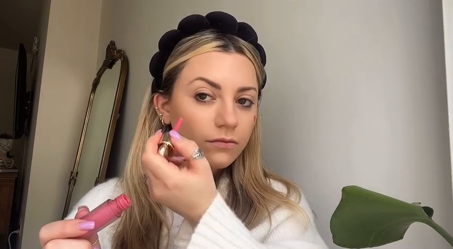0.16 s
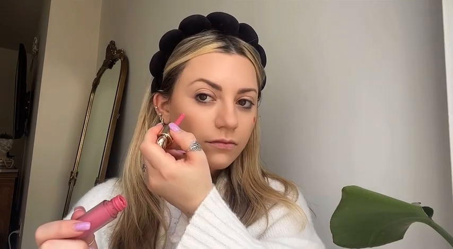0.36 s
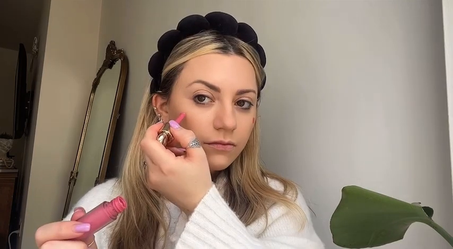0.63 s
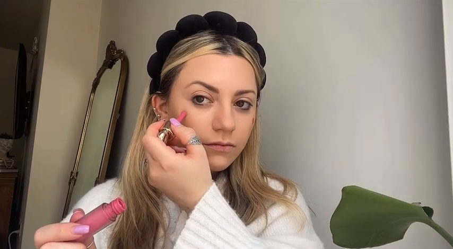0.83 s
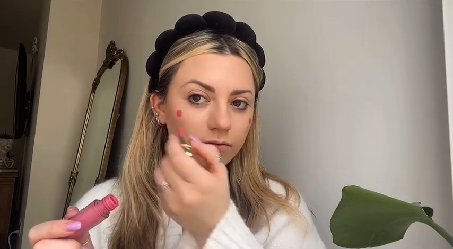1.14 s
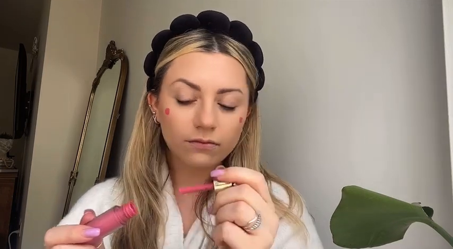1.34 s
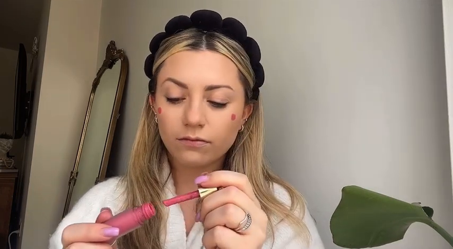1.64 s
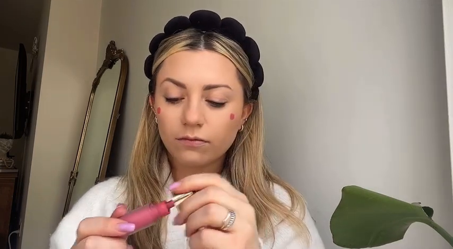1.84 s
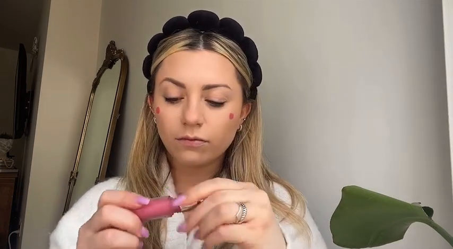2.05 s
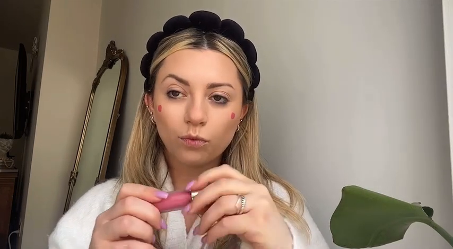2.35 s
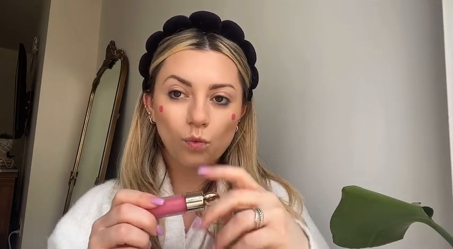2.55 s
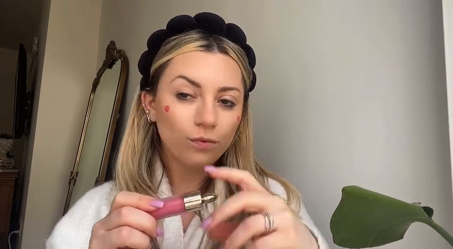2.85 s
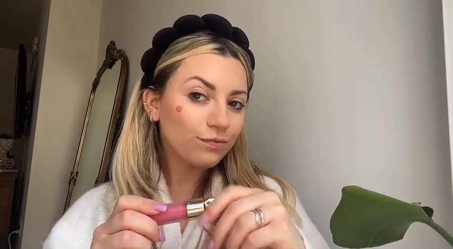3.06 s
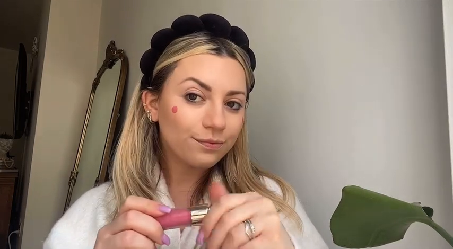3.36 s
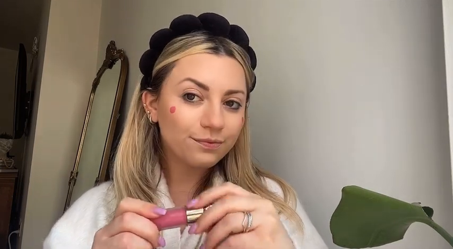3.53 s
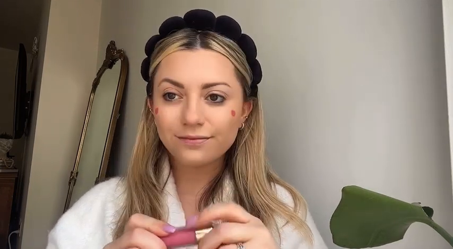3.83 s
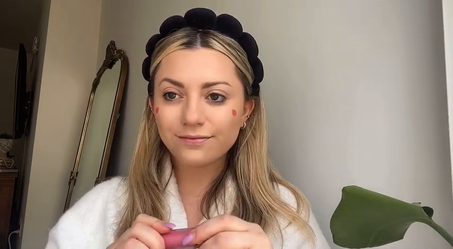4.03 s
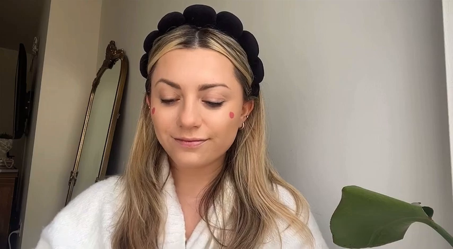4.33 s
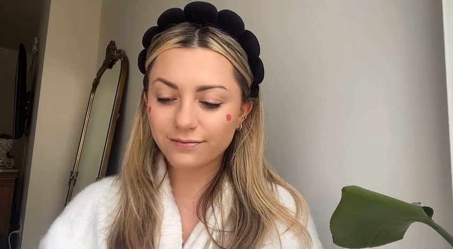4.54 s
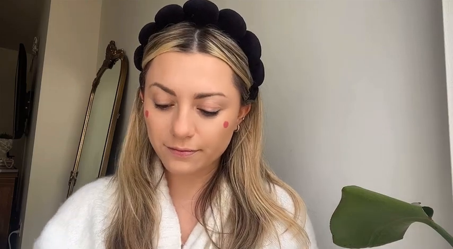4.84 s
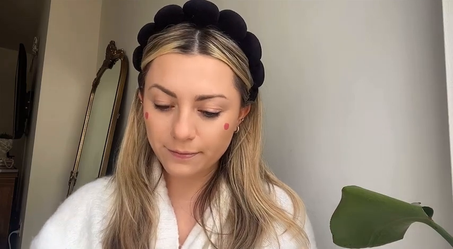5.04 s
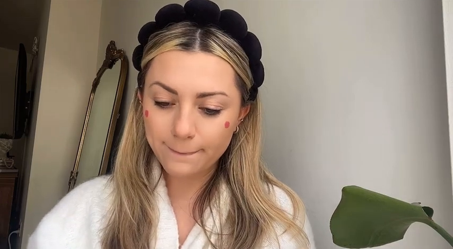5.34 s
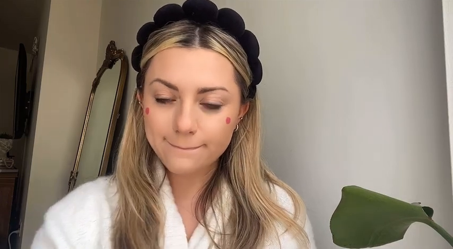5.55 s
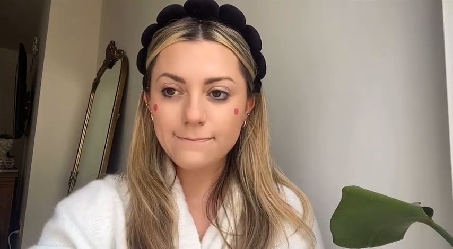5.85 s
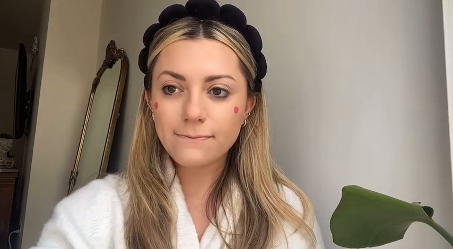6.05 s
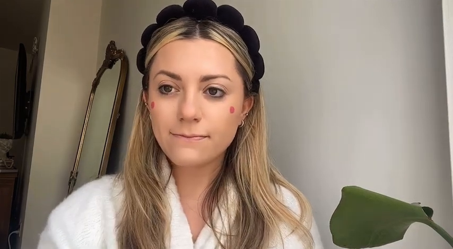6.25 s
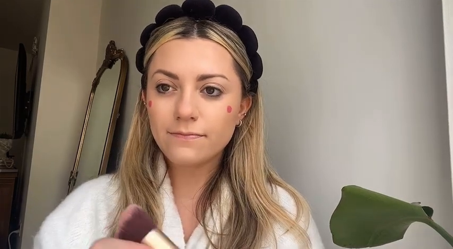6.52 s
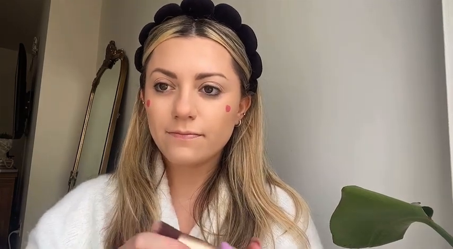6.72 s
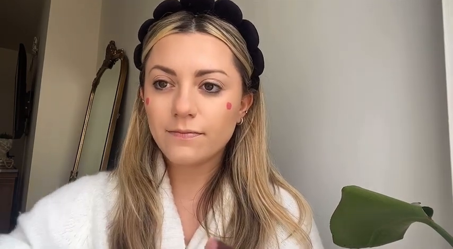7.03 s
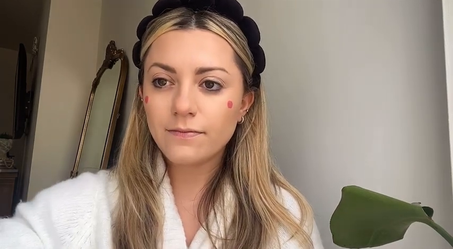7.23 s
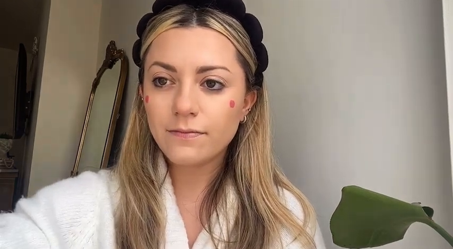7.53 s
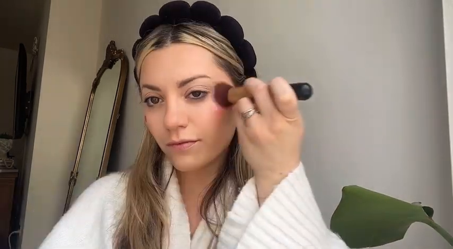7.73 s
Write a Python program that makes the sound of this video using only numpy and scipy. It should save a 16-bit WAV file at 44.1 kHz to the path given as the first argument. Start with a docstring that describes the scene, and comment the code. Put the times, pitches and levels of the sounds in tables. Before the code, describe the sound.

Close, dry handling of a makeup tube: near silence, a sharp cluster of plastic clicks, sparse cap ticks and soft skin glides. Later a hurried run of table knocks, sleeve rustle, thin metallic ticks from a brush collar, then a single strong clack. Only faint rubbing and steady low hum remain, with a tiny dropout near the end.

```python
"""A plastic makeup tube is handled close by in a small room: its wand clicks in the neck and the cap is screwed on.
Then things knock on the table, a brush is picked up and there is one hard clack. Each blow is a patter of
tiny contacts plus a clear ring, coloured by what the thing rings with. Sleeves, skin and fingers rub softly
(swelling noise), ventilation hums (shaped noise and wavering tones), and near the end the sound briefly drops out."""
import sys
import numpy as np
from scipy import signal
from scipy.fft import rfft, irfft
from scipy.io import wavfile
from scipy.ndimage import uniform_filter1d

SR = 44100
rng = np.random.default_rng(int(sys.argv[2]) if len(sys.argv) > 2 else 0)


def master_out(mix):
    """Clip the mix to full scale and print it as 16-bit PCM to the path in sys.argv[1]."""
    frames = np.transpose(np.atleast_2d(mix))
    ceiling = np.clip(frames, -1, 1)
    pcm = np.round(ceiling * 32767).astype(np.int16)
    wavfile.write(sys.argv[1], SR, pcm)


N = 347680
TIME = np.arange(N) / SR
TOP_HZ = 16000  # nearly everything above this is cut at the end
SIZE = 4096  # samples used to shape one blow
FREQS = np.fft.rfftfreq(SIZE, 1 / SR)


def undb(db):
    """Turn decibels into a gain."""
    return 10 ** (np.asarray(db) / 20)


def unit(x):
    """Scale a sound to an rms (average strength) of 1."""
    return x / np.sqrt(np.mean(x ** 2))


def contour(points, f):
    """Join (f/Hz, value) points by straight lines on a log-frequency axis."""
    hz, value = np.transpose(points)
    return np.interp(np.log(f + 1), np.log(hz), value)


def resonance(f, hz, width, db):
    """Power of one damped resonance: a peak at hz that falls away on both sides."""
    return undb(db) ** 2 / (1 + (2 * (f - hz) / width) ** 2)


def add(out, s, sound):
    """Mix a sound in from time s, leaving off any part outside the scene."""
    start = int(round(s * SR))
    lo, hi = max(start, 0), min(start + len(sound), N)
    out[lo:hi] += sound[lo - start:hi - start]


def walk(rate):
    """Slow random wandering with an rms of 1, smoothed from rate random steps per second."""
    step = int(SR / rate)
    wander = np.repeat(rng.standard_normal(N // step + 1), step)
    for _ in range(2):
        wander = uniform_filter1d(wander, step)
    return unit(wander[:N])


def causal(gain):
    """Minimum-phase response: a sharp start, then each peak rings out."""
    cepstrum = irfft(np.log(gain + 1e-9))
    cepstrum[1:SIZE // 2] *= 2
    cepstrum[SIZE // 2 + 1:] = 0
    return np.exp(rfft(cepstrum))


# How the room rings on after a click; each sound's wet_db is added to the level: (f/Hz, level/dB, 60 dB decay/s)
ROOM_TAIL = [(300, -5.5, 0.5), (610, -1.5, 0.32), (1350, -9, 0.39), (2500, -9.5, 0.5), (4000, -10, 0.53),
             (7500, -9, 0.44), (11000, -12, 0.34), (15000, -8, .25)]


def room(x, wet_db, build_s=0.0038, early_db=-13, early_s=0.0087):
    """A dense early scatter off nearby things, then a diffuse tail with its own decay in each band."""
    t = TIME[:SR]
    f = np.fft.rfftfreq(SR, 1 / SR)
    noise = rfft(rng.standard_normal(SR))
    centres = [row[0] for row in ROOM_TAIL]
    build = 1 - np.exp(-t / build_s)
    scatter = rng.standard_normal(SR) * build * np.exp(-t / early_s)
    response = undb(early_db) * scatter / np.sqrt(np.sum(scatter ** 2))
    # each row of the identity matrix picks one band, fading into its neighbours
    for (hz, db, t60), share in zip(ROOM_TAIL, np.eye(len(ROOM_TAIL))):
        band_gain = contour(list(zip(centres, share)), f)
        band = irfft(noise * band_gain, SR)
        fade = np.exp(-np.log(1000) * t / t60) * build
        response += undb(db + wet_db) * band * fade / np.sqrt(np.sum(fade ** 2))
    return signal.fftconvolve(x, response)[:N]


# Tone colour shared by all rubbing: (f/Hz, relative level/dB)
RUB_COLOUR = [(500, -39), (2500, 1), (5000, -1.5), (9300, -1.5), (11500, -9), (15000, -8)]


def rubbing(strokes, grain_db=5.5, width_hz=900):
    """Dense tiny slips swell and fade with each stroke (middle t/s, length/s, level/dB, resonance f/Hz, lift/dB)."""
    out = np.zeros(N)
    for s, length, db, hz, lift_db in strokes:
        n = int(length * SR)
        f = np.fft.rfftfreq(n, 1 / SR)
        grains_db = grain_db * np.minimum(rng.exponential(size=n), 4)
        slips = rng.standard_normal(n) * undb(grains_db)
        colour = undb(contour(RUB_COLOUR, f)) * np.sqrt(1 + resonance(f, hz, width_hz, lift_db))
        swell = np.sin(np.linspace(0, np.pi, n))
        # the level holds before the swell
        sound = undb(db) * unit(irfft(rfft(slips) * colour, n)) * swell
        add(out, s - length / 2, sound)
    return out


def contact(scrape_ms, bite=0.34, spread_ms=.7, order=91):
    """A patter of micro-contacts that bites in and dies away, evened out to a flat broad spectrum."""
    t = TIME[:SIZE] * 1000 / scrape_ms
    force = rng.standard_normal(SIZE) * np.exp(-t) * (1 - np.exp(-t / bite))
    spectrum = rfft(force)
    # bending waves are dispersive: the lows arrive after the highs
    lag = np.exp(-4j * np.pi * spread_ms * np.sqrt(FREQS / 1000))
    smooth = np.sqrt(uniform_filter1d(abs(spectrum) ** 2, order))
    return lag * spectrum / causal(smooth)


FIRM_DB = -8.5  # level of an ordinary firm blow
SCRAPE_DOUBLING_DB = 18.5  # a blow this much lighter slides twice as long
RING_DOUBLING_DB = 11.5  # a ring this much stronger lasts twice as long


def blows(events, modes, deep_db, thud_db, dulling, air_db, firm_scrape_ms, damping_hz, wet_db, focus):
    """Each contact rattles the object's modes and sets one ringing clearly; the room hears it too (focus 0-1)."""
    direct, around = np.zeros(N), np.zeros(N)
    body = 1 + sum(resonance(FREQS, *mode) for mode in modes)
    body = np.sqrt(body / body[FREQS < TOP_HZ].mean())
    for s, db, hard_db, ring_hz, ring_db in events:
        # a lighter touch slides longer and shifts the thud by dulling dB per dB
        light_db = FIRM_DB - db
        bass_db = thud_db + dulling * light_db
        scrape_ms = firm_scrape_ms * 2 ** (light_db / SCRAPE_DOUBLING_DB)
        # a loosely held part rings both louder and longer
        ring_width_hz = damping_hz * 2 ** (-ring_db / RING_DOUBLING_DB)
        top_db = air_db + hard_db
        tone = contour([(60, bass_db + deep_db - 27.5), (250, bass_db + deep_db),
                        (550, bass_db), (1200, bass_db), (2100, 0), (4800, 0.0039),
                        (6200, hard_db), (9600, hard_db), (11000, top_db), (15500, top_db)], FREQS)
        colour = causal(undb(db + tone) * body)
        ring = undb(ring_db) / (1 + 2j * (FREQS - ring_hz) / ring_width_hz)
        add(direct, s, irfft(colour * (contact(scrape_ms) + ring))[:SIZE // 2])
        # the walls collect sound from all directions, which averages out the contact's fine ripple
        ring_around = causal(np.sqrt(1 + abs(ring) ** 2) ** focus)
        add(around, s, irfft(colour * ring_around)[:SIZE // 2])
    return direct + room(around, wet_db)


# Tone colour of the rushing air: (f/Hz, relative level per Hz/dB)
AIR_COLOUR = [(22, -15.5), (36, -13.5), (46, 0), (72, 2), (86, -1.5), (140, 0.5), (195, -6.5), (290, -9),
              (480, -19), (1100, -24.5), (1550, -23.5), (3000, -41.5), (9000, -56), (11500, -58),
              (15000, -56)]
# Hum tones, each wandering around its level: (f/Hz, level/dB)
HUM_TONES = [(47.5, -62), (118.8, -54.5), (208.8, -55.5)]


def ventilation(air_db=-41.5, waver=0.57):
    """A steady low rush of air with a few hum tones unsteady in level and pitch (waver in radians)."""
    gain = undb(contour(AIR_COLOUR, np.fft.rfftfreq(N, 1 / SR)))
    rush = unit(irfft(rfft(rng.standard_normal(N)) * gain, N))
    hum = np.zeros(N)
    for hz, db in HUM_TONES:
        level = undb(db + 2 * walk(3)) * np.sqrt(2)
        hum += level * np.sin(2 * np.pi * hz * TIME + waver * walk(6))
    return rush * undb(air_db) + hum


# Broad soft rubs of sleeve and skin: (middle t/s, length/s, level/dB)
SLEEVE_RUBS = [(0.018, 0.091, -68.5), (0.902, 0.23, -68), (1.4, 0.39, -73.5), (5.405, 0.18, -61.5),
               (5.63, 0.22, -61), (6.18, 0.13, -64), (6.749, 0.24, -68), (7.312, 0.31, -71.5)]


def sleeve_and_skin(cloth_hz=6500, cloth_db=2):
    """Sleeve and skin slip softly, with only a slight resonance."""
    return rubbing([(*rub, cloth_hz, cloth_db) for rub in SLEEVE_RUBS])


SQUEAK_HZ, SQUEAK_DB = 8800, 7.5  # thin squeak shared by all fingers on plastic
# Fingertips gliding over plastic: (middle t/s, length/s, level/dB)
FINGER_GLIDES = [(0.68, 0.17, -74), (3.407, 0.061, -65), (3.472, 0.051, -56.5), (3.749, 0.12, -61.5),
                 (4.0, 0.22, -68), (4.346, 0.1, -69), (4.615, 0.1, -71.5), (4.923, 0.042, -68),
                 (7.077, 0.045, -63)]


def finger_glides():
    """Fingertips slip over plastic with a thin squeaky resonance."""
    return rubbing([(*glide, SQUEAK_HZ, SQUEAK_DB) for glide in FINGER_GLIDES])


# Blows of the wand in the neck: (t/s, level/dB, hardness/dB, ring f/Hz, ring level/dB)
# In all blow tables hardness lifts the treble, and grip and contact point favour the ring.
WAND_CLICKS = [(2.0085, -4, -1.5, 7020, 24.5), (2.02, -22, 1, 6970, 22), (2.025, -16, 2, 7000, 14),
               (2.033, -11.5, 6.5, 7300, 10), (2.0355, -11.5, 6, 14200, 7), (2.0385, -12.5, 2, 7050, 26),
               (2.0435, -14, 3, 4100, 5.5)]
# What the wand rings with: (f/Hz, width/Hz, level over the contact noise/dB)
WAND_MODES = [(1400, 400, 10), (2964, 270, 8), (4200, 380, 11), (5570, 300, -5.5), (8500, 340, 5),
              (9250, 300, -0.5), (14400, 600, 8)]


def wand_clicks():
    """The wand strikes the neck with short bright blows that ring."""
    return blows(WAND_CLICKS, WAND_MODES, deep_db=8.0, thud_db=-6.5, dulling=-.1, air_db=-8,
                 firm_scrape_ms=1.8, damping_hz=900, wet_db=-3.5, focus=0.64)


# The wand past the rim, then through the wiper: (middle t/s, length/s, level/dB, resonance f/Hz, lift/dB)
WAND_SCRAPES = [(2.037, 0.015, -28, 7300, 19), (2.049, .02, -36, 3900, 16.5)]


def wand_scrapes():
    """The wand slips past rim and wiper, each with its own strong resonance."""
    return rubbing(WAND_SCRAPES)


# Clicks of the cap as it meets the neck and is handled: (t/s, level/dB, hardness/dB, ring f/Hz, ring level/dB)
CAP_CLICKS = [(2.0522, -9.5, -6, 3700, 8), (2.2425, -22, -2, 2930, 21), (2.2885, -12.5, -3, 2860, 12.4),
              (2.483, -17, -12, 3020, 3), (2.4907, -21, 3, 2220, 23.5), (2.492, -21, 11.5, 9400, 7),
              (2.576, -14.5, -2.5, 2350, 6.3), (2.798, -24.5, -3, 4600, 11), (2.8098, -11, -1.5, 1580, 4.3),
              (2.846, -22, -3.5, 8200, 1), (3.1102, -13.5, -1.5, 4430, 11), (3.8549, -23, 3, 2840, 23.4),
              (3.856, -28, 5, 7900, 18.4), (3.916, -26.5, -1.5, 4570, 4), (4.822, -24, 6.5, 13000, 6)]
# What the cap rings with: (f/Hz, width/Hz, level over the contact noise/dB)
CAP_MODES = [(1390, 280, 8.2), (2110, 270, 0.86), (2830, 300, 5.8), (4660, 180, 2), (6300, 750, 5.3),
             (7200, 480, 3.8), (8160, 420, 8.6), (9100, 260, 2.2), (14100, 750, 3.8)]


def cap_clicks():
    """The plastic cap clicks on the neck and in the hand, and its modes rattle briefly."""
    return blows(CAP_CLICKS, CAP_MODES, deep_db=1, thud_db=-2.5, dulling=0.27, air_db=-8.5,
                 firm_scrape_ms=1.0, damping_hz=550, wet_db=0.0, focus=1.0)


def cap_twists(thread_bites_s=2.45, after_s=.055, length_s=.07, below_click_db=-51):
    """Once the thread bites, the cap is screwed down: after each click the fingers glide on."""
    twists = []
    for s, db, *_ in CAP_CLICKS:
        if s > thread_bites_s:
            twists.append((s + after_s, length_s, db + below_click_db, SQUEAK_HZ, SQUEAK_DB))
    return rubbing(twists)


# Things set down on the table: (t/s, level/dB, hardness/dB, ring f/Hz, ring level/dB)
TABLE_KNOCKS = [(5.194, -13.5, 5.5, 704, 8), (5.1965, -9, -25, 1440, 17.5), (5.221, -25, -14, 1490, 16),
                (5.2395, -8.5, -4.5, 2500, -1), (5.251, -1.5, -6.5, 1380, 14), (5.3368, -8, -5.5, 1690, 4),
                (5.347, -15, -3, 645, 3), (5.379, -22, 2, 1580, 10), (5.432, -6.5, -4, 5100, 14),
                (5.4873, -23, -5, 2520, 14)]
# What they ring with: (f/Hz, width/Hz, level over the contact noise/dB)
TABLE_MODES = [(333, 100, 8.5), (580, 68, 10.5), (716, 81, 9.5), (1370, 160, 8.5), (1700, 440, 8),
               (2560, 490, 9.5), (3400, 460, 5), (5800, 430, 6), (8300, 910, 4.5)]


def table_knocks(rebound_s=.008, rebound_db=-12.5, rebound_hard_db=-1.5):
    """What is set down rocks and touches again, lighter and softer, after every knock."""
    rebounds = []
    for s, db, hard_db, ring_hz, ring_db in TABLE_KNOCKS:
        rebounds.append((s + rebound_s, db + rebound_db, hard_db + rebound_hard_db, ring_hz, ring_db / 2))
    return blows(TABLE_KNOCKS + rebounds, TABLE_MODES, deep_db=4, thud_db=2.5, dulling=0.56, air_db=-8.5,
                 firm_scrape_ms=1.6, damping_hz=473, wet_db=-2.0, focus=0.79)


# Small taps and a ringing ferrule: (t/s, level/dB, hardness/dB, ring f/Hz, ring level/dB)
BRUSH_TAPS = [(5.7308, -21, 3.5, 8000, 4), (5.7592, -29.5, 10.5, 14000, 6), (5.8385, -21.5, 5.5, 9800, 10),
              (5.881, -16.5, 0, 6940, 3), (5.886, -13.5, -9.5, 1870, 3), (5.9478, -28, -17, 3500, 4),
              (6.0097, -34, 9, 9900, 6), (6.032, -32.5, 8, 7000, 11), (6.1498, -10.5, -6, 3340, 20.3),
              (6.163, -15, -9, 3470, 16), (6.173, -18, -14.5, 3520, 17), (6.2476, -25, 0, 3420, 21)]
# What the brush rings with: (f/Hz, width/Hz, level over the contact noise/dB)
BRUSH_MODES = [(540, 250, 4), (1390, 130, 1.9), (2240, 460, 5.2), (3530, 310, 6.2), (7600, 310, 2.6)]


def brush_taps():
    """The brush is picked up: light taps, and its metal collar (the ferrule) rings."""
    return blows(BRUSH_TAPS, BRUSH_MODES, deep_db=12, thud_db=7.5, dulling=-0.24, air_db=-10.0,
                 firm_scrape_ms=1.4, damping_hz=520, wet_db=0.5, focus=0.94)


# A hard thing struck, then the surface's thud: (t/s, level/dB, hardness/dB, ring f/Hz, ring level/dB)
HARD_CLACK = [(6.3047, 9, -4, 2000, 12), (6.31, -15.5, -10, 820, 11)]
# What they ring with: (f/Hz, width/Hz, level over the contact noise/dB)
CLACK_MODES = [(528, 59, 11.3), (696, 110, 6.7), (910, 78, 11), (3180, 310, 5.1), (3700, 130, 11),
               (4070, 150, 2.9), (4700, 400, 3.2), (5940, 300, 5.7), (7100, 320, 5.6), (7600, 300, 4),
               (8400, 400, 4), (10000, 490, 2.5), (14700, 750, 2.7)]


def hard_clack():
    """One strong blow excites many modes, and a weaker, lower thud follows at once."""
    return blows(HARD_CLACK, CLACK_MODES, deep_db=7.0, thud_db=4, dulling=0.78, air_db=-12.0,
                 firm_scrape_ms=1.77, damping_hz=600, wet_db=-3.0, focus=0.4)


def scene():
    """Mix the blows, the rubbing with its room sound, and the ventilation."""
    rubs = sleeve_and_skin() + finger_glides() + wand_scrapes() + cap_twists()
    handling = wand_clicks() + cap_clicks() + table_knocks() + brush_taps() + hard_clack()
    return (ventilation() + rubs + room(rubs, wet_db=2.0) + handling)[None]


# The short dropout near the end: (start t/s, end t/s, level change/dB)
DROPOUT = (7.731, 7.789, -52)


def record(dry):
    """The sound drops out briefly, and a steep low-pass filter cuts the top."""
    start, end, db = DROPOUT
    inside = (TIME > start) & (TIME < end)
    gap = uniform_filter1d(inside * 1., size=128)  # soften its edges
    top_cut = signal.ellip(8, .2, 70, TOP_HZ, fs=SR, output="sos")
    return signal.sosfilt(top_cut, dry * undb(db * gap))


dry = scene()
out = record(dry)
master_out(out)
```